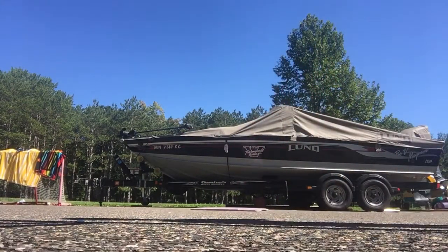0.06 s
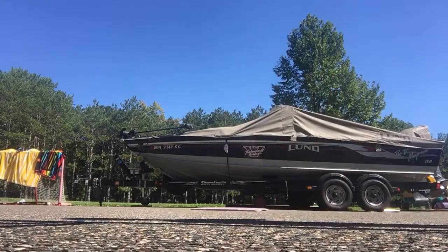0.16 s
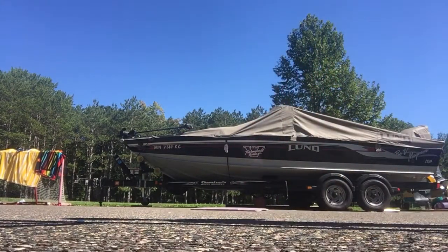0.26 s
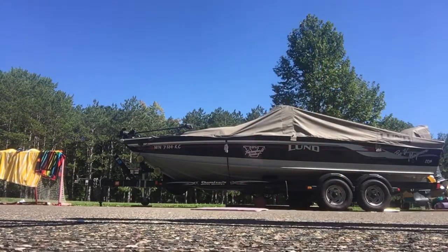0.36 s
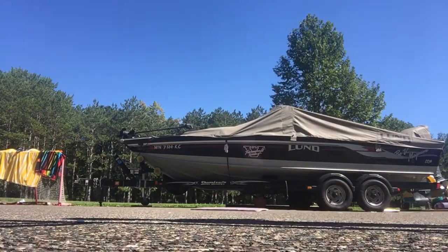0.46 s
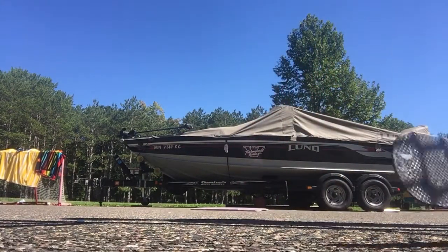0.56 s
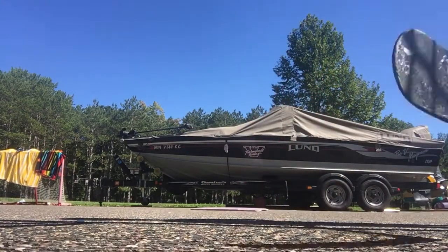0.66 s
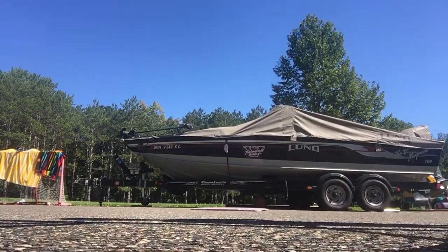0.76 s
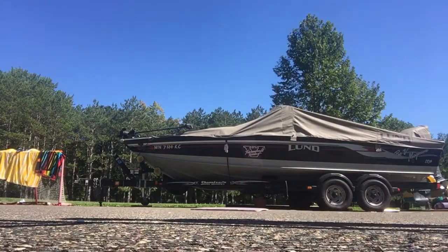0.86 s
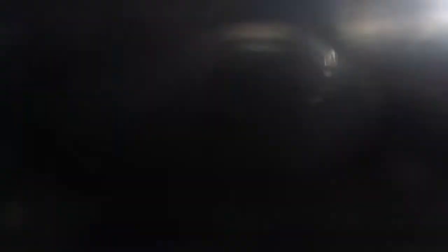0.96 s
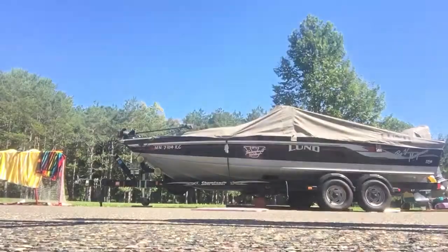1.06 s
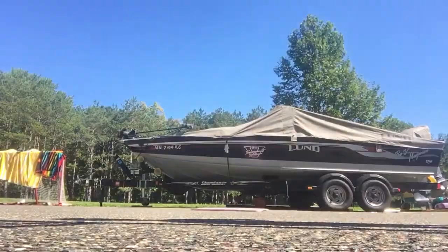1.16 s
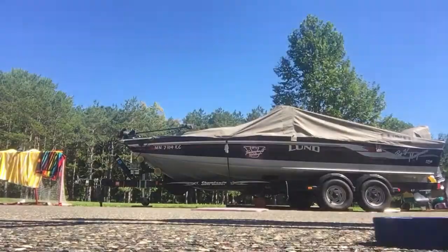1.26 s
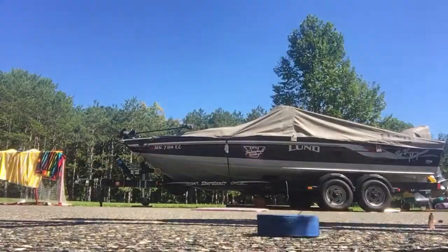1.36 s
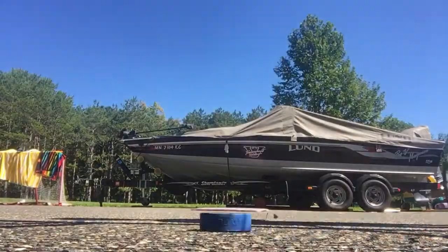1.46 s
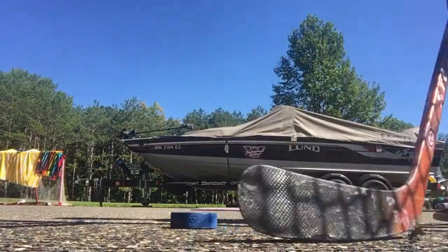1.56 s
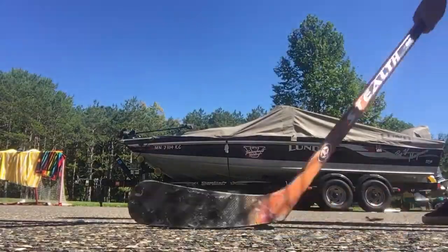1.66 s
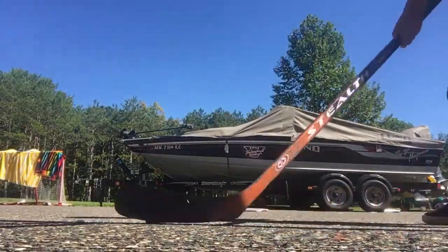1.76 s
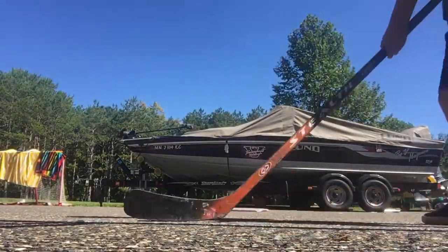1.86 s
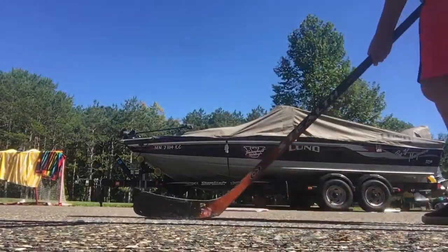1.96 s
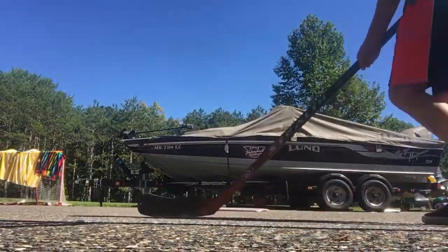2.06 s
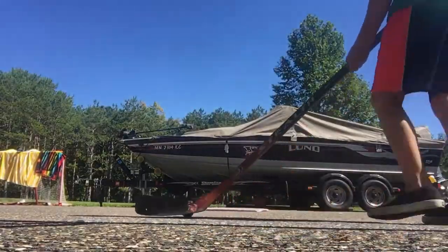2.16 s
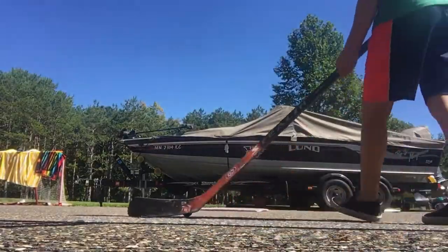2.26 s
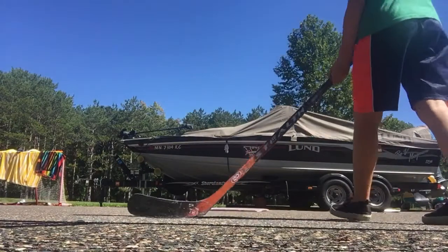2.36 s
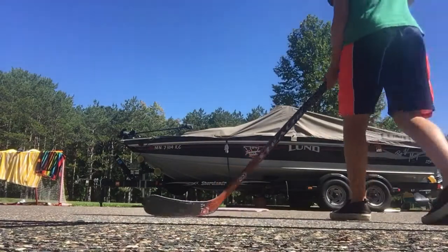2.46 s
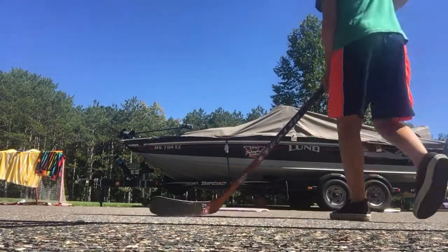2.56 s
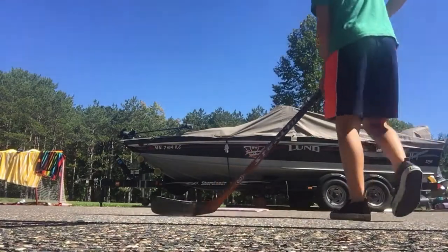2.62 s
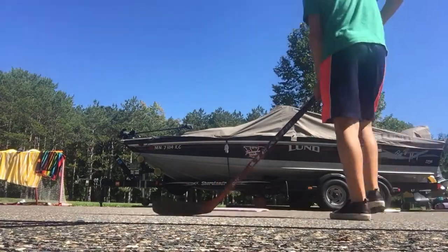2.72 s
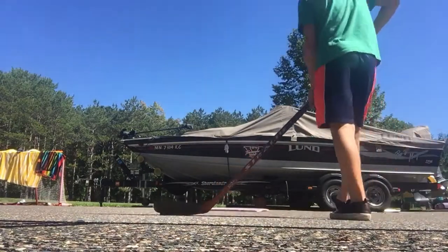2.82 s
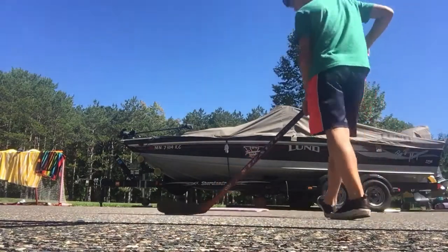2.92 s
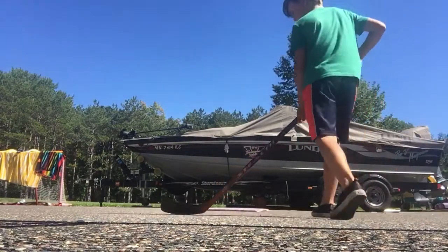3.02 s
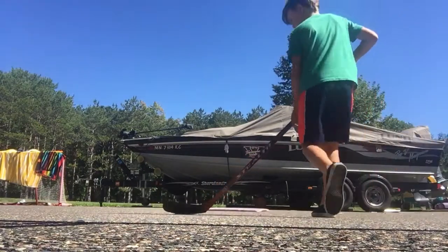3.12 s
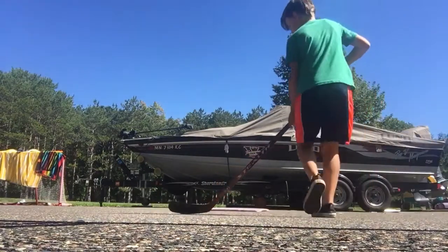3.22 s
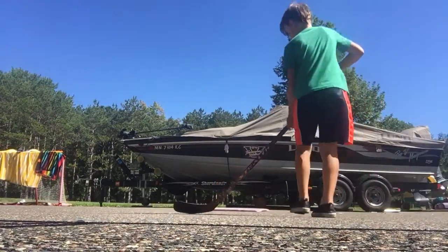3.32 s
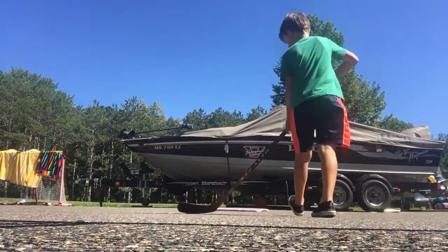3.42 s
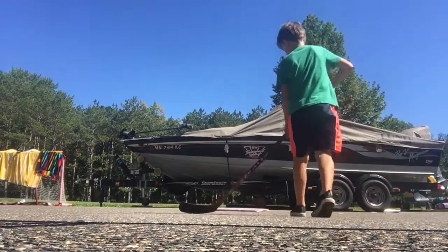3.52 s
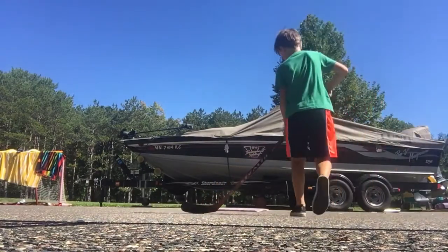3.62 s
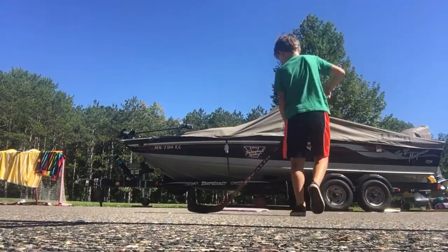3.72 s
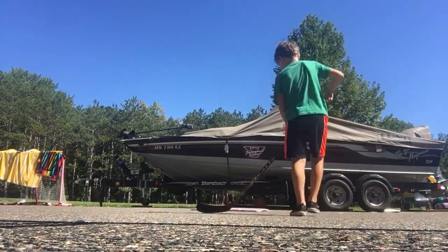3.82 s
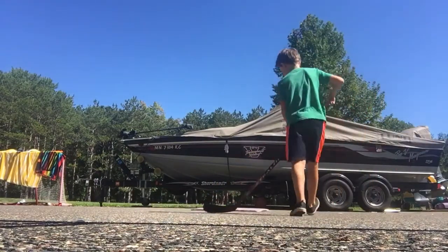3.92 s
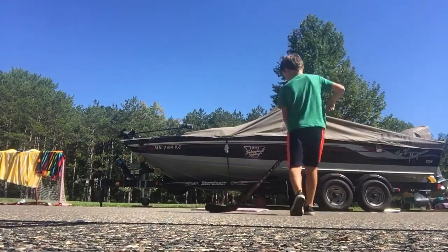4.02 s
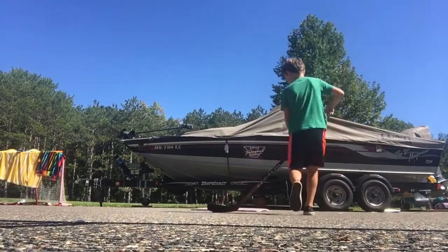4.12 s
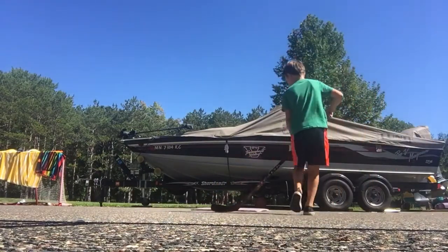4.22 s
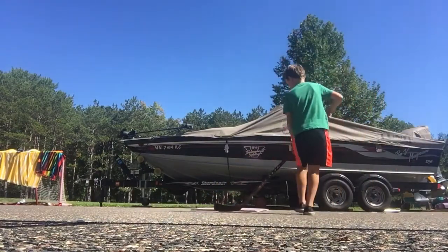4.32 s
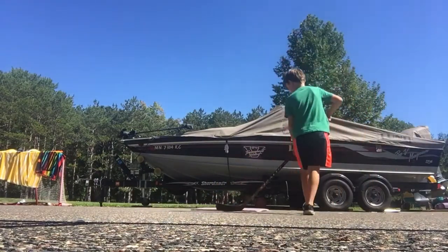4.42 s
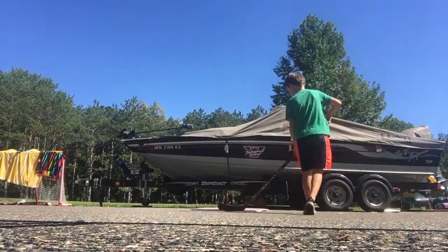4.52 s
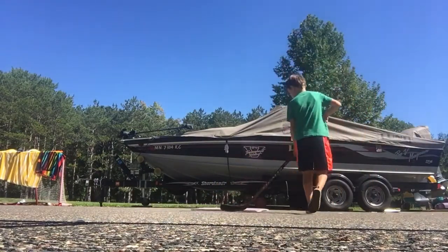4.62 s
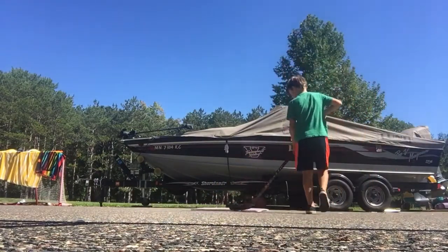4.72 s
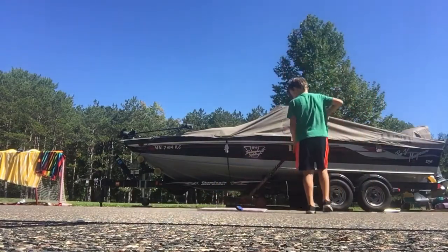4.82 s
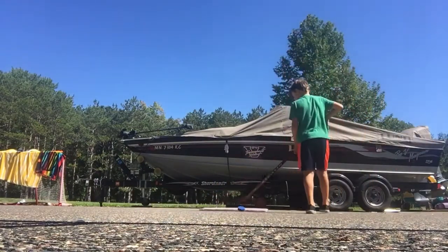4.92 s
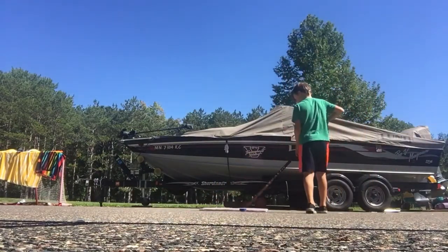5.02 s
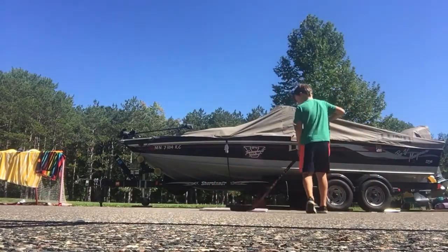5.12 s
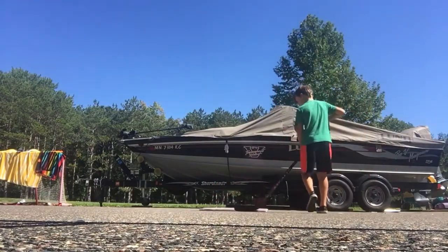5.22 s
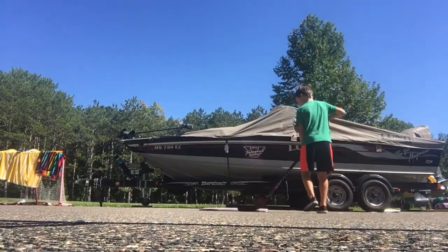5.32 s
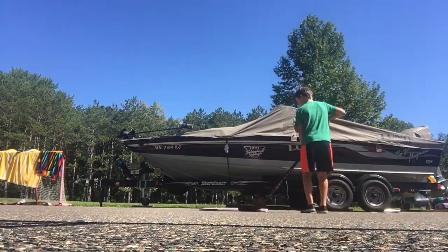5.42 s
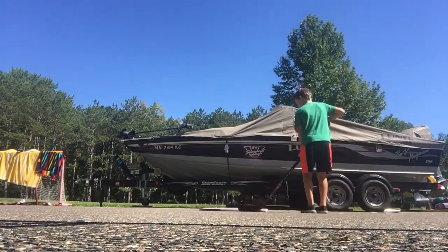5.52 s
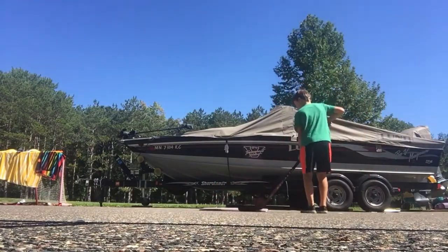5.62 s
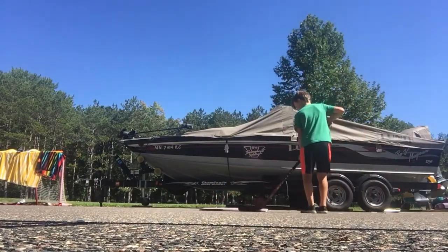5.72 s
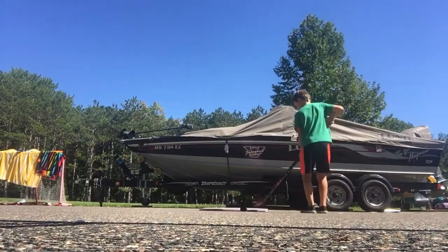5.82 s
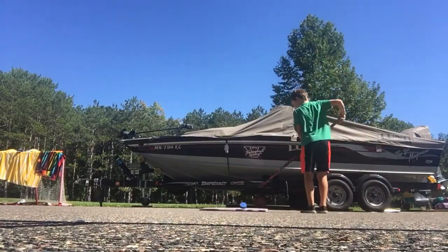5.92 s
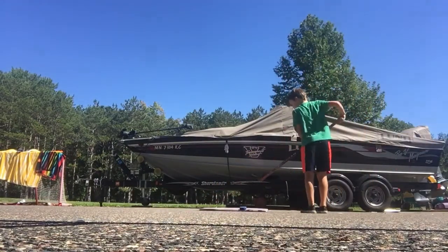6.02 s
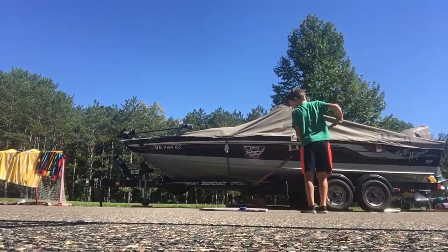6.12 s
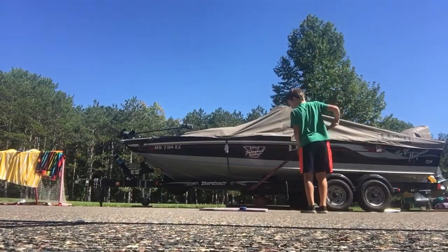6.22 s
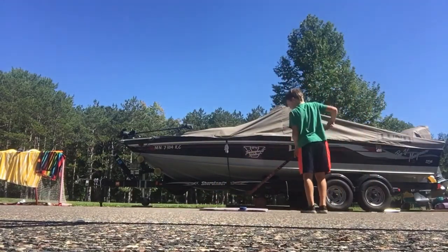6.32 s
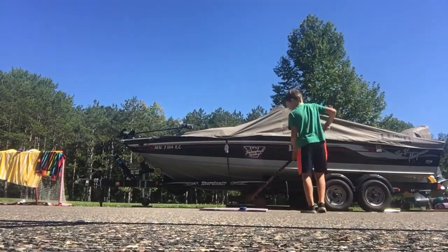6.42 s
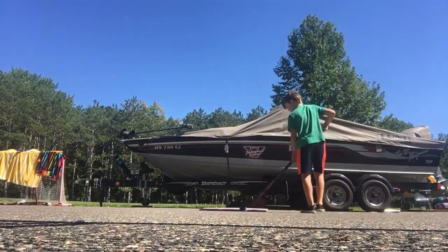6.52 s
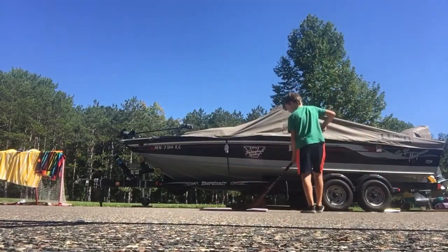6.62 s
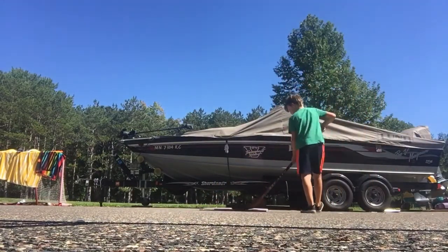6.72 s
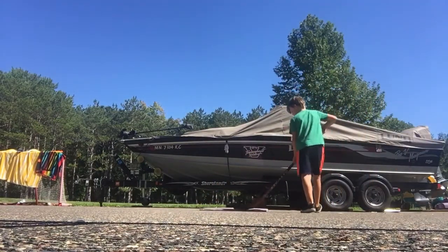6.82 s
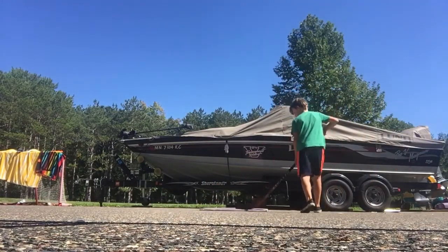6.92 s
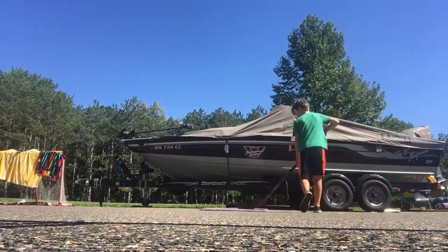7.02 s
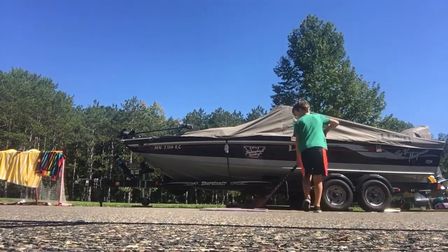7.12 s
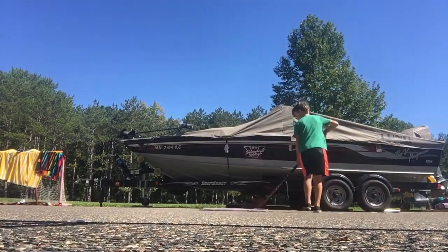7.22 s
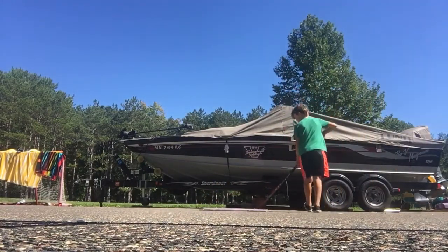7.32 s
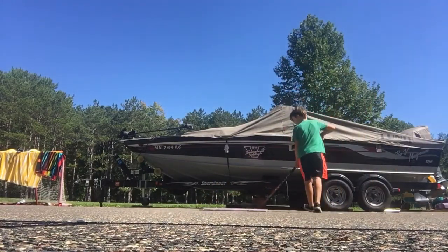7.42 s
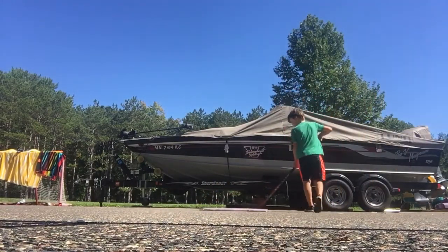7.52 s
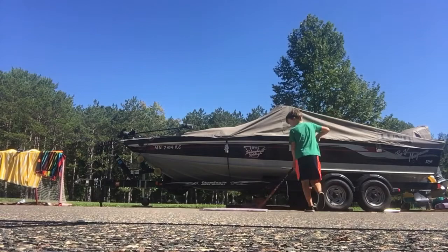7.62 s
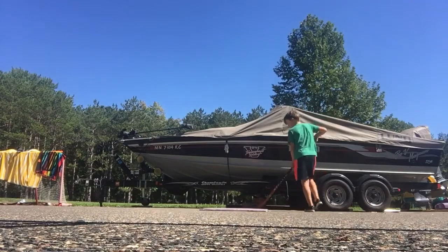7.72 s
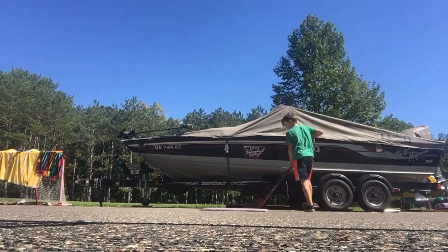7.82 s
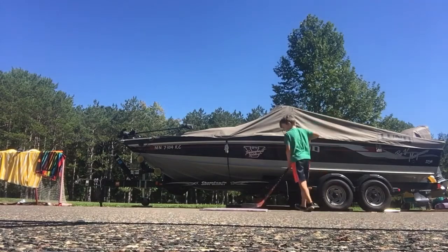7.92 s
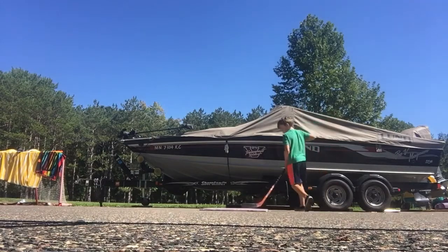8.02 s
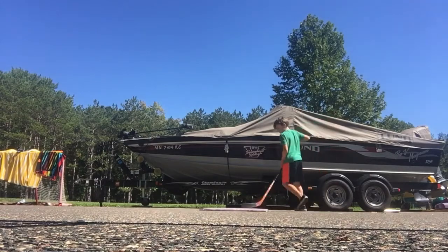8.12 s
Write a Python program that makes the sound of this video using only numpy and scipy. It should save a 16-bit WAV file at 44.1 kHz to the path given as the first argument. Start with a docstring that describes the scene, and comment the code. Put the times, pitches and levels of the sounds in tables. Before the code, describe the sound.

On an open driveway, the microphone lies on the ground. After a hushed start come a hollow rubber clack and tight volley of hard stick blows, very close and loud. A coarse, stuttering blade scrape over stones follows, loudest before two seconds, then breaking into lighter, receding drags with gritty ticks. Finally a distant plastic sheet is brushed and tapped, with smooth faint puck slides over low outdoor air and only a thin, short echo.

```python
"""Asphalt driveway: a hockey stick knocks a puck right beside a phone, then is dragged away, the blade
skipping from stone to stone with grit crunching under it. Further off it scrapes onto a plastic pad,
taps it and slides pucks across with a soft hiss; quiet outdoor air lies behind. Hits are clicks and
noise bursts plus decaying modes, scrapes are random grains through such modes, air is coloured noise."""
import sys
import numpy as np
from scipy import signal
from scipy.fft import rfft, irfft, next_fast_len
from scipy.io import wavfile
from scipy.ndimage import uniform_filter1d

SR = 44100
rng = np.random.default_rng(int(sys.argv[2]) if len(sys.argv) > 2 else 0)


def transcribe(u):
    """Save the signal u as a 16-bit wav file named by the first command-line argument.

    u: samples, shape (n,) or (channels, n), limited to [-1, 1]; the rate is SR.
    q: integer samples, one column per channel.
    """
    v = np.clip(np.atleast_2d(u).T, -1, 1)
    q = np.round(v * 32767).astype(np.int16)
    wavfile.write(sys.argv[1], SR, q)


N = 360297
TIME_S = np.arange(N) / SR
AGE_S = np.arange(16384) / SR
TOP_HZ = 15900

# Hit levels are rms over the first 6 ms. Mode levels and colours are relative.
# Outdoor air colour. Each row: frequency in Hz, level in dB.
AIR_COLOUR = [(15, -35.5), (25, -18.5), (53, 3), (75, -3), (119, -9.5), (193, -13.5), (469, -29.5),
              (1080, -29.5), (1950, -33), (4040, -35.5), (4870, -40), (6550, -41), (10400, -52.5),
              (13200, -45), (15500, -54.5)]
AIR_DB = -54
# Soft low rustle at the start. Each row: time in seconds, level in dB.
RUSTLE = [(0, -61), (.16, -48.5), (.3, -57), (.5, -52), (.9, -66)]
RUSTLE_COLOUR = [(90, 0.5), (200, 3.5), (380, -1.0), (700, -35.5)]  # Hz, dB

# Blade snagging on larger stones. Each row: start in seconds, level in dB, extra bass in dB,
# extra treble in dB (both shelves act before the level is set).
SKIPS = [(.109, -27, -4.5, -8), (.2229, -47.5, -3, 4), (0.2828, -51.5, 11, 3), (1.262, -26, -9, -0.5),
         (1.3829, -25.5, -2.5, 5), (1.4136, -29, -13, 6.5), (1.4762, -31.5, -7, 10), (1.508, -28, -22, 11),
         (1.5287, -16, -23.5, -5.5), (1.5423, -11, -28.5, -2.5), (1.558, -12, -19.5, 4),
         (1.5875, -12.5, -20, -9), (1.599, -13, -5, 5), (1.6331, -10, -5, 2.5), (1.6484, -7, -11.5, -13),
         (1.6648, -9.5, -12, -6.5), (1.6885, -7.5, -9, 5), (1.706, -8.5, -4, -7), (1.7393, -17.5, 2, -4),
         (1.8075, -10, 4.5, 6), (1.8191, -11.5, -18, -8), (1.905, -19, -4, -3), (1.9251, -13.5, -18, -3.5),
         (1.942, -11, -6.5, -4), (1.97, -18.5, -15, -16), (1.983, -13.5, 3, -2.5), (2.0162, -20.5, -5, -2),
         (2.0445, -24.5, 1, -6), (2.063, -27.5, 5, -3), (2.1248, -28.5, -12.5, -5), (2.251, -34, 0.5, -0.5),
         (2.422, -27, 5.5, 3), (2.4588, -21.5, -23, 14), (2.493, -9, -4, -13), (2.5338, -15.5, -2.5, -3),
         (2.5933, -20, 1, 4.5), (2.6044, -22, -6, -4), (2.6763, -27, 2, 0), (2.7481, -21.5, -3, -15),
         (2.8382, -23, 4, -16), (2.868, -19, -6, -1), (2.883, -24.5, -9, -11), (2.9054, -20.5, -23.5, -4),
         (2.944, -21, -1.5, -1.5), (2.9672, -23, -14, -12), (2.984, -20, -1.5, -7), (3.013, -23.5, -12, 12),
         (3.088, -13, -16.5, 10), (3.1668, -21, 3, -1.5), (3.2, -28.5, 15, 0), (3.3381, -24.5, -1, 6),
         (3.3621, -33, 8, 19), (3.5039, -29, -4, -1), (3.63, -29, -2, -6), (3.658, -29, -7, -10),
         (3.8016, -24, 7, -9), (3.8981, -25.5, 2.5, 8.5), (3.9737, -25.5, 7, 6), (4.0893, -26, 1.5, 3),
         (4.1833, -23.5, 1, -.5), (4.246, -28.5, -4, -18), (4.4701, -27.5, -24, -12), (4.572, -27, -3, -12),
         (4.6859, -24, -25, 22), (5.1693, -26, -13, 5.5), (5.1886, -32, -40, -2), (5.2175, -29.5, -4, -9),
         (5.27, -37.5, -23, 0), (5.296, -28, -6.5, -7), (5.315, -36.5, -25, -9), (5.384, -33, -24, -0.5)]
# Blade colour. Each row: frequency in Hz, level in dB.
BLADE_COLOUR = [(60, -18), (200, -17), (300, -1), (500, -2), (800, 1), (1100, -1.5), (1900, -6),
                (2900, -8.5), (3300, -10.5), (4300, -13.5), (5500, -17), (8000, -27), (10500, -32.5),
                (15500, -41)]
# Short blade resonances. Each row: frequency in Hz, t60 in seconds, level in dB.
BLADE_MODES = [(308.7, 0.062, -9), (395, 0.046, -12.5), (646, .04, -15.5), (1051, 0.059, -8),
               (1182, 0.046, -3.5), (1313, 0.15, -17.5), (1621, .04, -5.5), (2165, 0.045, -4.5),
               (2500, 0.017, -4), (2692, 0.017, 7), (2830, 0.071, -11.5), (3697, 0.028, -5.5),
               (4245, .03, -4)]
# Brief rings of each contact: median frequency, log spread, decay, level
STONE_HZ, STONE_OCTAVES, STONE_T60_S, STONE_DB = 3202, 0.9, 0.029, -34.5

# Plastic on plastic and light brushing. Each row: time of full pressure in seconds, attack in seconds,
# hold in seconds, release in seconds, level in dB before the mix trims, sizzle against rub in dB.
SLIDES = [(0.481, 0.11, 0.014, 0.014, -38, -7.5), (4.67, 0.15, 0.019, 0.086, -33, -10),
          (4.769, .015, .05, .1, -39, -10), (4.84, 0.066, 0.012, 0.2, -34, -8),
          (5.174, .03, 0.14, 0.072, -44.5, -18), (5.438, 0.1, 0.013, 0.064, -34, -22),
          (5.62, 0.056, 0.0066, 0.15, -50.5, -10), (5.772, 0.069, .01, 0.044, -56, -5.5),
          (5.892, 0.026, 0.011, 0.044, -42.5, -16), (6.612, 0.016, 0.018, 0.056, -49, -7),
          (6.792, 0.062, 0.11, 0.22, -50.5, -10.5), (7.05, 0.31, .52, 0.45, -46, -8),
          (7.7, 0.33, 0.14, .2, -49.5, -10.5), (8.107, 0.26, .03, 0.23, -56.5, -11)]
SLIDE_RANGE_DB = 29.5  # rise over the attack, fall over the release
RUB_TRIM_DB, SIZZLE_TRIM_DB = -3.5, -1.5
# Sliding friction colour. Each row: frequency in Hz, level in dB.
SLIDE_COLOUR = [(250, -26), (400, -3.5), (600, -10.5), (1100, 1.5), (2200, 5.5), (2900, 5), (3500, 2.5),
                (4500, -0.5), (6500, -17), (9500, -47), (15500, -23)]
SIZZLE_COLOUR = [(2500, -7), (5800, 3.5), (9500, -6.5), (12000, -11), (15500, -26)]  # Hz, dB
# Blade modes singing under light friction. Each row: frequency in Hz, t60 in seconds, level in dB.
SINGING_MODES = [(1180, 0.065, -9), (2110, .06, -33), (2800, 0.06, -2.5), (2960, 0.13, 10)]

# Dull knocks of the rubber puck. Each row: start in seconds, level in dB, extra bass in dB,
# extra treble in dB, clatter time constant in seconds.
KNOCKS = [(0.9131, -5.5, 0.5, -4.5, 0.0053), (.9779, -28, 17.5, -10.5, 0.011),
          (0.994, -26.5, 15.5, -15, 0.012)]
# Puck colour. Each row: frequency in Hz, level in dB.
PUCK_COLOUR = [(60, -14.5), (150, -4.5), (300, -5), (550, 2), (1200, -7), (2200, -6), (3300, -9.5),
               (4500, -24.5), (7000, -35.5), (10000, -45.5), (15500, -41)]
# Puck modes. Each row: frequency in Hz, t60 in seconds, level in dB.
PUCK_MODES = [(172, 0.053, -16), (275, 0.048, -1.5), (540, 0.045, 2), (520, 0.04, -3), (583, 0.26, -10),
              (794, 0.059, 0.5), (910, 0.09, 0), (1245, .14, -5.5), (1800, 0.1, -2), (2140, .06, -0.5),
              (2420, .05, -4), (2877, .07, -4)]

# Puck and blade rubbing over asphalt close by. Each row: time in seconds, level in dB.
RUB = [(.915, -31), (.96, -35.5), (.99, -46.5), (1.047, -38.5), (1.06, -18), (1.075, -36), (1.13, -40.5),
       (1.23, -44.5), (1.36, -62)]
# Close rub colour. Each row: frequency in Hz, level in dB.
RUB_COLOUR = [(100, -2), (500, 3.5), (1500, 3.5), (3000, -1), (4500, -7), (7000, -11.5), (10000, -19),
              (15500, -21)]
# Pushes of the blade along the ground. Each row: start in seconds, end in seconds, chatter level in dB,
# grit level in dB (both at mid-push), swell from start to end in dB.
PUSHES = [(1.253, 1.32, -33.5, -47.5, -8), (1.44, 1.513, -35, -42, 6), (1.55, 1.764, -34, -65, 6),
          (1.82, 1.877, -21.5, -22, -0.5), (1.915, 1.938, -19, -39, -11), (2.25, 2.452, -45, -41.5, 7),
          (2.438, 2.64, -30, -52, -1), (2.695, 3.126, -26.5, -34, -5.5), (3.18, 3.311, -31.5, -46, 0),
          (3.35, 3.418, -47, -46.5, -8), (3.46, 3.835, -35, -49.5, -3.5), (3.862, 4.28, -34.5, -42, -0.5),
          (4.342, 4.71, -36.5, -37.5, 1.5), (5.159, 5.475, -41, -51, -8)]
PUSH_RAMP_S = 0.014  # blade lands and lifts
# Grit around a snag: level against the snag, build and fade time constants
SCUFF_DB, SCUFF_BUILD_S, SCUFF_FADE_S = -19.5, 0.003, 0.0068
# Blade riding over the pad, one list per stroke. Each row: time in seconds, level in dB.
PAD_STROKES = [
    [(4.76, -37), (4.8, -38), (4.87, -44), (4.93, -50), (5.08, -55)],
    [(5.15, -62), (5.2, -55), (5.33, -66), (5.44, -50.5), (5.5, -76)],
]

# Hard blows beside the phone. Each row: start in seconds, level in dB, extra treble in dB,
# ring length as a factor, clatter time constant in seconds.
BLOWS = [(1.0628, -8, 12, 1, 0.004), (1.071, -6, -9, 0.97, 0.0043), (1.087, -7.5, -35, 1, 0.0035),
         (1.098, -12.5, -8.5, 0.29, 0.0032), (1.127, -13.5, -11.5, 0.5, 0.0041),
         (1.1656, -11.5, 7.5, 0.66, 0.0032), (1.185, -16, -8.5, 0.52, 0.0027)]
# Stick colour. Each row: frequency in Hz, level in dB.
STICK_COLOUR = [(60, -20), (200, -10), (550, 1), (1200, -5.5), (2000, -4), (3000, -7), (4500, -12),
                (7000, -37), (10000, -50.5), (15500, -42.5)]
# Stick modes. Each row: frequency in Hz, t60 in seconds before the blow's length factor, level in dB.
STICK_MODES = [(179.9, 0.32, -17), (440.4, 0.42, -11.5), (608, 0.2, -3), (714, 0.064, -7.5),
               (807, 0.19, -1.5), (1005, 0.31, -5.5), (1147, .16, -8), (1178, 0.19, -5), (1328, 0.24, -3.5),
               (1450, .12, -14), (1555, 0.17, -1.5), (1855, 0.17, -2.5), (1920, .1, -10), (2070, .1, -8.5),
               (2270, 0.22, -10.5), (2520, 0.15, -13), (2900, 0.082, 4.5), (3294, .09, -20),
               (3600, .07, -4), (4450, .05, -15)]

# Small hops: median time between them, its log spread, time in the air around a snag
HOP_S, HOP_SPREAD, HOP_CLEAR_S = 0.018, 0.28, 0.01
HOP_SCATTER_DB, HOP_BASS_DB, HOP_TREBLE_DB, HOP_COLOUR_DB = 2.5, 4.5, -2, 4.5

# Sand grains cracking under the blade. Each row: start in seconds, level in dB.
SNAPS = [(1.689, -27), (2.459, -24.5), (2.654, -49.5), (3.0145, -42), (3.1817, -37), (3.3391, -35),
         (3.8983, -55)]
# Crack colour. Each row: frequency in Hz, level in dB.
SNAP_COLOUR = [(1000, -30), (5000, -2.5), (9500, 1), (13000, -8), (15500, -4)]
# Heavy ground contacts. Each row: start in seconds, level in dB, pitch in Hz, t60 in seconds.
THUDS = [(1.708, -24, 131, 0.057), (1.821, -40.5, 165, 0.079), (2.492, -32, 162, 0.047),
         (4.768, -38, 104.9, 0.096)]

# Taps on the plastic pad. Each row: start in seconds, level in dB, extra treble in dB,
# clatter time constant in seconds.
TAPS = [(4.765, -35.5, 19, 0.0056), (4.783, -31.5, 12, 0.0087), (5.7895, -38.5, -23, 0.0055),
        (5.8064, -44, -33, 0.0054), (6.0265, -37.5, -8.5, 0.0076), (6.0429, -31.5, -15.5, 0.00037),
        (6.059, -37, -11.5, 0.042), (6.261, -59, 16, 0.0012), (6.428, -54, -0.5, 0.0051),
        (6.741, -47, -27, 0.0041), (6.7531, -49, -26, 0.0069), (8.015, -57, -18, 0.003)]
# Pad colour. Each row: frequency in Hz, level in dB.
PAD_COLOUR = [(60, -17), (200, -4.5), (400, -1), (1000, -3), (2000, -2), (3000, -4.5), (5000, -11.5),
              (9000, -24.5), (15500, -34)]
# Pad modes. Each row: frequency in Hz, t60 in seconds, level in dB.
PAD_MODES = [(344, 0.26, -8.5), (382.6, 0.28, -1.5), (556.6, 0.11, -14), (620, 0.091, -12), (842, 0.3, -15),
             (1144, 0.22, -10.5), (2150, 0.091, -8), (2880, 0.03, 6)]

ECHO_COLOUR = [(200, 0.5), (1200, 3.5), (3000, -1.5), (9000, -1.5)]  # Hz, dB


def undb(db):
    """Decibels to gain."""
    return 10 ** (np.asarray(db) / 20)


def unit(x):
    """Scale to rms 1."""
    return x / np.sqrt(np.mean(x ** 2))


def colour(x, points, bass_db=0, treble_db=0):
    """Minimum-phase filter through (Hz, dB) points, with a bass and a treble shelf."""
    size = 2 * next_fast_len(len(x) // 2 + 1024)
    f_hz = np.maximum(np.arange(size // 2 + 1) * SR / size, 1)
    hz, db = np.transpose(points)
    shape_db = np.interp(np.log(f_hz), np.log(hz), db)
    shape_db += bass_db / (1 + (f_hz / 800) ** 4)
    shape_db += treble_db / (1 + (3800 / f_hz) ** 3)
    # folding the cepstrum makes the filter causal
    cepstrum = irfft(np.log(undb(shape_db)))
    cepstrum[1:size // 2] *= 2
    cepstrum[size // 2 + 1:] = 0
    response = np.exp(rfft(cepstrum))
    return irfft(rfft(x, size) * response)[:len(x)]


def add(out, start_s, sound, db):
    """Mix in a hit at the given rms level over its first 6 ms."""
    i = int(start_s * SR)
    gain = undb(db) / np.sqrt(np.mean(sound[:265] ** 2))
    out[i:i + len(sound)] += gain * sound[:N - i]


def body(modes, ring_db, scatter_db, detune, length=1, size=16384):
    """A direct crack plus decaying modes; their share and pitch depend on where the contact lands."""
    age_s = AGE_S[:size]
    hz, t60_s, db = np.transpose(modes)[:, :, None]
    share, pitch = rng.standard_normal((2, len(modes), 1))
    fade = np.exp(-np.log(1000) * age_s / (t60_s * length))
    tones = np.cos(2 * np.pi * hz * (1 + detune * pitch) * age_s)
    rings = undb(db + scatter_db * share) * fade * tones
    return (age_s == 0) + undb(ring_db) * rings.sum(axis=0)


def contact(clatter_s, clatter_db, size=16384):
    """A first touch, then a noise rush of tiny contacts that builds for a moment and fades."""
    age_s = AGE_S[:size]
    envelope = np.exp(-age_s / max(clatter_s, 1e-4)) * (1 - np.exp(-age_s / 0.0008))
    rush = rng.standard_normal(size) * envelope
    return (age_s == 0) + undb(clatter_db) * rush / np.linalg.norm(rush)


def grain_sizes(count, spread_db):
    """Grain strengths of random sign, most small and a few large."""
    strength = undb(spread_db * np.minimum(rng.exponential(size=count), 4))
    return strength * rng.choice([-1, 1], count)


def grains(rate_hz, spread_db):
    """Randomly timed clicks."""
    return (rng.random(N) < rate_hz / SR) * grain_sizes(N, spread_db)


def walk(rate_hz):
    """Smooth random curve with a spread near 1."""
    step = int(SR / rate_hz)
    held = np.repeat(rng.standard_normal(N // step + 1), step)
    return unit(uniform_filter1d(held, step)[:N])


def strokes(tables):
    """Gain over time from one level curve per stroke, silent between strokes."""
    gain = np.zeros(N)
    for rows in tables:
        s, db = np.transpose(rows)
        gain += undb(np.interp(TIME_S, s, db, left=-np.inf, right=-np.inf))
    return uniform_filter1d(gain, size=200)


def scrape(modes, points, rate_hz, spread_db, ring_db, count=10):
    """Grains crunching into a resonant body at several contact points, each with its own timbre; rms 1."""
    out = np.zeros(N)
    for _ in range(count):
        crumble = rng.standard_normal(200) * np.exp(-AGE_S[:200] / 0.0007)
        point = body(modes, ring_db, scatter_db=8.5, detune=0.027, size=6000)
        ring = signal.fftconvolve(crumble, point)
        times = rng.integers(0, N, int(rate_hz * N / SR / count))
        clicks = np.bincount(times, grain_sizes(len(times), spread_db), N)
        out += signal.oaconvolve(clicks, ring)[:N]
    return unit(colour(out, points))


def air():
    """Low outdoor rumble with a faint hiss; a soft rustle lies over it at first."""
    level_db = AIR_DB + 0.24 * walk(2.9)
    outdoors = unit(colour(rng.standard_normal(N), AIR_COLOUR)) * undb(level_db)
    rustle = unit(colour(rng.standard_normal(N), RUSTLE_COLOUR))
    return outdoors + rustle * strokes([RUSTLE])


def stone(count=5, size=3600):
    """Brief rings that depend on the stone and on the part of the blade that meets it."""
    age_s = AGE_S[:size]
    octaves = STONE_OCTAVES * rng.standard_normal((count, 1))
    hz = np.minimum(STONE_HZ * 2 ** octaves, TOP_HZ)
    tones = np.cos(2 * np.pi * hz * age_s).sum(axis=0)
    return undb(STONE_DB - 60 * age_s / STONE_T60_S) * tones


def skip(bass_db, treble_db, clatter_s):
    """A stone stops the blade and sets it briefly ringing; some snap cleanly, some crumble."""
    blade = body(BLADE_MODES, ring_db=-36, scatter_db=2.5, detune=0.021, size=3600) + stone()
    crumble = contact(clatter_s, clatter_db=5 + 5.5 * rng.standard_normal(), size=1200)
    return colour(signal.fftconvolve(crumble, blade), BLADE_COLOUR, bass_db, treble_db)


def skipping_blade(skips, clatter_s):
    """The blade jumps from stone to stone."""
    out = np.zeros(N)
    for s, db, bass_db, treble_db in skips:
        add(out, s, skip(bass_db, treble_db, clatter_s), db)
    return out


def sliding():
    """Dense friction grains make the blade sing faintly under each slide; dust adds a brighter sizzle."""
    singing = body(SINGING_MODES, ring_db=-52.5, scatter_db=1, detune=0)
    friction = signal.oaconvolve(grains(rate_hz=9000, spread_db=4.0), singing)[:N]
    rub = unit(colour(friction, SLIDE_COLOUR))
    sizzle = unit(colour(grains(rate_hz=5200, spread_db=3.5), SIZZLE_COLOUR))
    rub_gain = sizzle_gain = 0
    for s, attack_s, hold_s, release_s, db, sizzle_db in SLIDES:
        before = (s - TIME_S) / attack_s
        after = (TIME_S - s - hold_s) / release_s
        away = np.clip(np.maximum(before, after), 0, 10)
        gain = undb(db - SLIDE_RANGE_DB * away)
        rub_gain = np.maximum(rub_gain, gain)
        sizzle_gain = np.maximum(sizzle_gain, gain * undb(sizzle_db))
    pressure = undb(0.9 * walk(45))
    return (undb(RUB_TRIM_DB) * rub * rub_gain + undb(SIZZLE_TRIM_DB) * sizzle * sizzle_gain) * pressure


def puck_knocks():
    """Hard rubber gives a short, hollow clack."""
    out = np.zeros(N)
    for s, db, bass_db, treble_db, clatter_s in KNOCKS:
        puck = body(PUCK_MODES, ring_db=-19.5, scatter_db=3.0, detune=0.0044)
        clack = puck + contact(clatter_s, clatter_db=21.0)
        add(out, s, colour(clack, PUCK_COLOUR, bass_db, treble_db), db)
    return out


def push(t_s, start_s, end_s, swell_db):
    """Pressure during one push: the blade lands, bears down more or less, and lifts."""
    along = np.clip((t_s - start_s) / (end_s - start_s), 0, 1)
    down = np.clip(np.minimum(t_s - start_s, end_s - t_s) / PUSH_RAMP_S + 1, 0, 1)
    return down * undb(swell_db * (along - 0.5))


def scuffs():
    """Gain of the grit that piles up against each snag and scatters after it."""
    gain = np.zeros(N)
    age_s = AGE_S[:6000] - 0.02  # starts ahead of the snag
    shape = np.exp(np.minimum(age_s / SCUFF_BUILD_S, -age_s / SCUFF_FADE_S))
    for s, db, *_ in SKIPS:
        i = int((s + age_s[0]) * SR)
        gain[i:i + len(age_s)] += undb(db + SCUFF_DB) * shape
    return gain


def dragging_blade():
    """Stick and blade rub close by, crunch over sand around the skips, then rumble onto the hollow pad."""
    close = scrape(STICK_MODES, RUB_COLOUR, rate_hz=1600, spread_db=5.0, ring_db=-54.0, count=3)
    asphalt = scrape(BLADE_MODES, BLADE_COLOUR, rate_hz=560, spread_db=5.0, ring_db=-38.0)
    pad = scrape(PAD_MODES, PAD_COLOUR, rate_hz=1100, spread_db=4.5, ring_db=-43, count=3)
    pressure = np.zeros(N)
    for start_s, end_s, _, grit_db, swell_db in PUSHES:
        pressure += undb(grit_db) * push(TIME_S, start_s, end_s, swell_db)
    return close * strokes([RUB]) + asphalt * (pressure + scuffs()) + pad * strokes(PAD_STROKES)


def stick_blows():
    """Blows on the puck ring the stick; ground pressure shortens it, shifting contact splits its modes."""
    out = np.zeros(N)
    for s, db, treble_db, length, clatter_s in BLOWS:
        stick = body(STICK_MODES, ring_db=-10, scatter_db=-1.5, detune=0.0044, length=length)
        split = body(STICK_MODES, ring_db=-18.5, scatter_db=4.5, detune=0.07, length=0.6 * length)
        blow = stick + split + contact(clatter_s, clatter_db=23.5)
        add(out, s, colour(blow, STICK_COLOUR, 0, treble_db), db)
    return out


def hops(count=40):
    """Between snags the pushed blade chatters in small, uneven hops, yielded as rows like SKIPS."""
    snags_s = np.array(SKIPS)[:, 0]
    for start_s, end_s, db, _, swell_db in PUSHES:
        s = start_s
        for gap, strength, bass, treble in rng.standard_normal((count, 4)):
            if s < end_s and np.abs(snags_s - s).min() > HOP_CLEAR_S:
                push_db = 20 * np.log10(push(s, start_s, end_s, swell_db))
                level_db = db + push_db + HOP_SCATTER_DB * strength
                bass_db = HOP_BASS_DB + HOP_COLOUR_DB * bass
                treble_db = HOP_TREBLE_DB + HOP_COLOUR_DB * treble
                yield s, level_db, bass_db, treble_db
            s += HOP_S * np.exp(HOP_SPREAD * gap)


def cracking_sand():
    """A pinched grain bursts with a thin, very bright tick."""
    out = np.zeros(N)
    for s, db in SNAPS:
        tick = contact(clatter_s=0.00069, clatter_db=12.5, size=1200)
        add(out, s, colour(tick, SNAP_COLOUR), db)
    return out


def ground_thuds():
    """Heavy contacts add a low, quickly damped thump."""
    out = np.zeros(N)
    for s, db, hz, t60_s in THUDS:
        thump = np.sin(2 * np.pi * hz * AGE_S) * undb(-60 * AGE_S / t60_s)
        add(out, s, thump, db)
    return out


def pad_taps():
    """Blade and pucks slap the loose plastic sheet, which drums hollowly."""
    out = np.zeros(N)
    for s, db, treble_db, clatter_s in TAPS:
        pad = body(PAD_MODES, ring_db=-30, scatter_db=2, detune=0.009)
        slap = pad + contact(clatter_s, clatter_db=7.5)
        add(out, s, colour(slap, PAD_COLOUR, 0, treble_db), db)
    return out


def yard(x):
    """A thin, dull scatter from the boat, house and trees: convolution with swelling, decaying noise."""
    envelope = undb(-60 * AGE_S / 0.17) * (1 - np.exp(-AGE_S / 0.014))
    echo = colour(rng.standard_normal(len(AGE_S)) * envelope, ECHO_COLOUR)
    return undb(-21.5) * signal.fftconvolve(x, echo / np.linalg.norm(echo))[:N]


def scene():
    """All contacts, their echo and the air, in one channel."""
    outdoors = air()
    skips = skipping_blade(SKIPS, clatter_s=0.0026)
    chatter = skipping_blade(list(hops()), clatter_s=0.0023)
    scraping = skips + chatter + sliding() + dragging_blade()
    hits = puck_knocks() + stick_blows() + cracking_sand() + ground_thuds() + pad_taps()
    play = hits + scraping
    return (play + yard(play) + outdoors)[None]


def record(dry):
    """The phone drops the deepest bass, rounds off the loudest peaks and cuts the top."""
    lean = signal.sosfilt(signal.butter(5, 42, "high", fs=SR, output="sos"), dry)
    rounded = lean / (1 + lean ** 4) ** 0.25
    return signal.sosfilt(signal.ellip(8, 0.2, 80, TOP_HZ, fs=SR, output="sos"), rounded)


dry = scene()
out = record(dry)
transcribe(out)
```